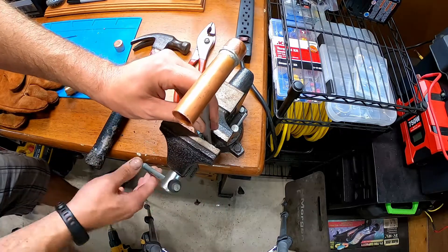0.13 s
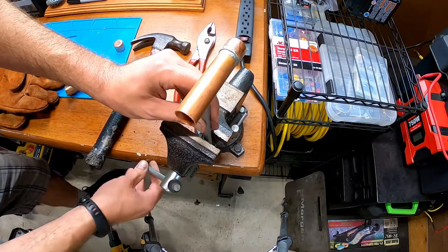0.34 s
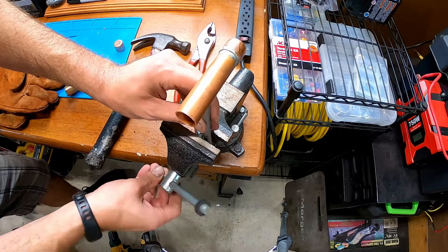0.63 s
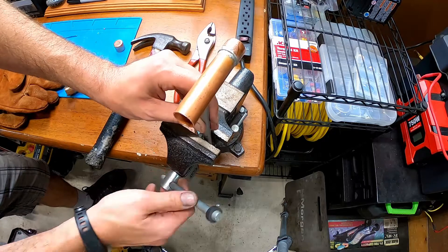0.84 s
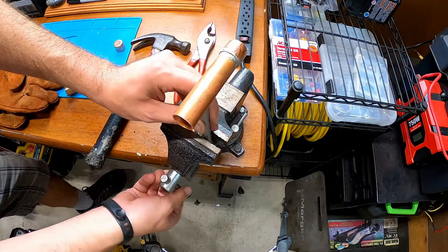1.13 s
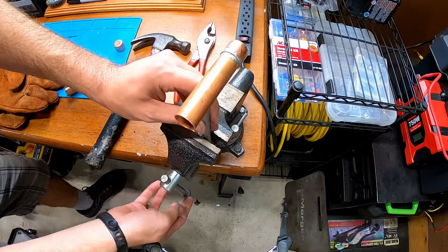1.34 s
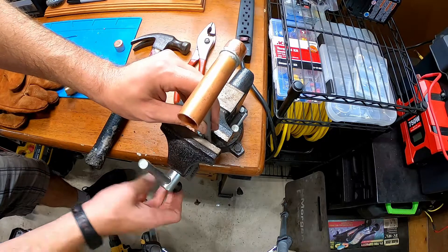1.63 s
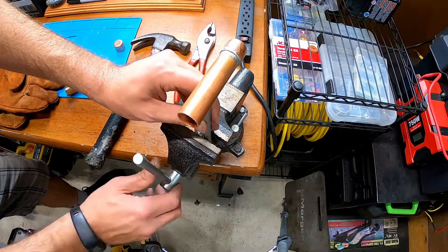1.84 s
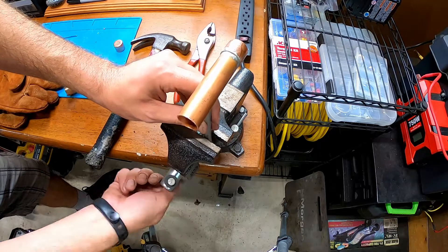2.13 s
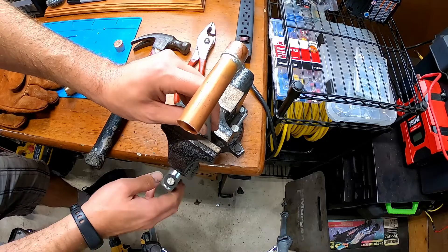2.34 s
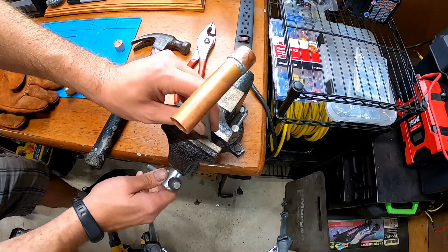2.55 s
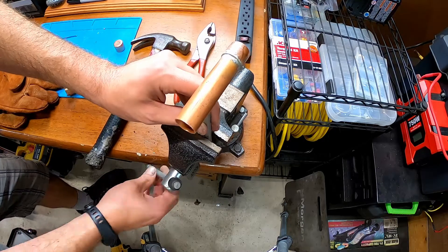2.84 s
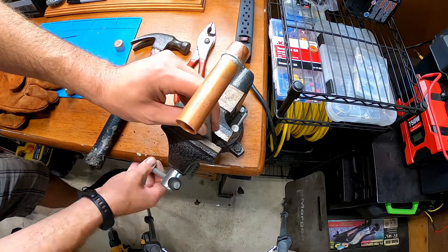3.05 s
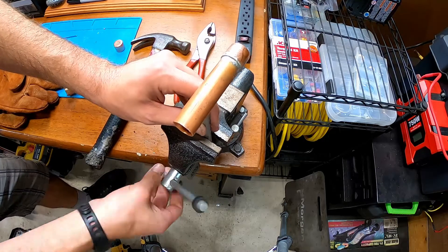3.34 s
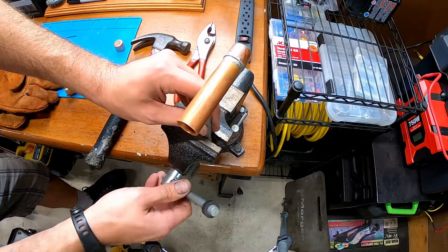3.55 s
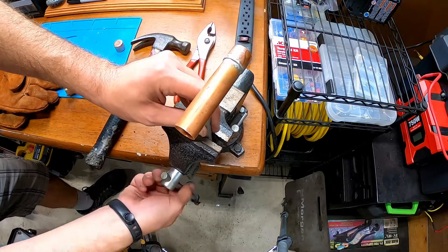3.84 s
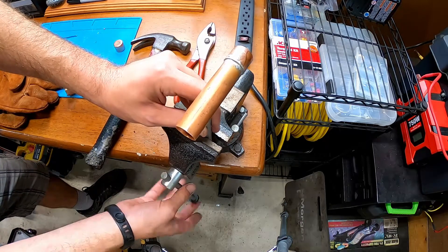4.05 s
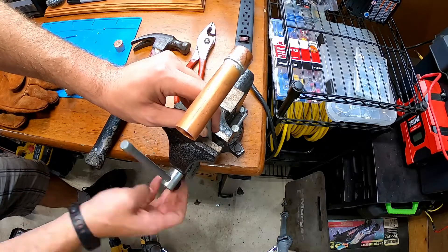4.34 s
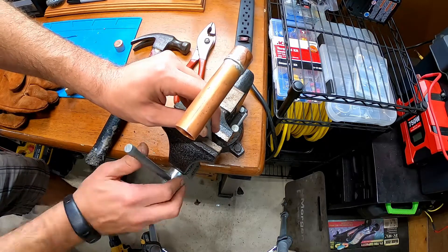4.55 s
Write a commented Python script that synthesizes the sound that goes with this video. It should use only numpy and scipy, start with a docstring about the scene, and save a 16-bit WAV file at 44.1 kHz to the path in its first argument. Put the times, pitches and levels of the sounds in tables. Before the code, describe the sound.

A dull iron clunk opens, then a bright sharp clack, a scrape, and more knocks as a vise handle turns and its bar slides to its stops. Quieter ticks fill the gaps, then a calmer stretch leads to a scrape and the brightest, loudest clank near the end. Dry close stereo pickup in a lightly reverberant garage, with a low murmur and faint insect-like hiss behind.

```python
"""Garage murmur and a thin high hiss, perhaps insects outside, run throughout: shaped and narrow noise.
Over them a cast-iron bench vise is cranked shut close by, its wooden bench humming in low noise bands.
The steel handle bar knocks at its stops: rattling contacts ring modes of iron and bar over noisy cracks.
It also scrapes through its hole, a train of tiny slips driving the same modes.
The garage answers with a sparse, thin reverb."""
import sys
import numpy as np
from scipy import signal
from scipy.fft import rfft, irfft, next_fast_len
from scipy.io import wavfile
from scipy.ndimage import uniform_filter1d

SR = 44100
rng = np.random.default_rng(int(sys.argv[2]) if len(sys.argv) > 2 else 0)


def file_out(sig):
    """Save sig as 16-bit WAV at sys.argv[1]."""
    # one column per channel
    cols = np.atleast_2d(sig).T
    # limit, then scale
    lim = np.clip(cols, -1, 1)
    pcm = np.round(lim * 32767).astype(np.int16)
    wavfile.write(sys.argv[1], SR, pcm)


N = 207262  # length in samples


def gain_of(db):
    """Decibels to an amplitude factor."""
    return 10 ** (np.asarray(db) / 20)


def evened(x):
    """Scales to rms 1."""
    return x / np.sqrt(np.mean(x ** 2) + 1e-20)


def smoothed_twice(x, size):
    """Two running means in a row."""
    return uniform_filter1d(uniform_filter1d(x, size), size)


def read(points, hz):
    """Reads a curve of (f/Hz, value) on a log-frequency axis."""
    f, value = np.transpose(points)
    return np.interp(np.log(hz + 1), np.log(f + 1), value)


def add(mix, s, sound):
    """Mixes a sound in at s seconds."""
    part = mix[round(s * SR):][:len(sound)]
    part += sound[:len(part)]


def resonate(x, hz, width):
    """One-pole resonance: shifts hz down to zero, smooths, and shifts back."""
    turn = np.exp(2j * np.pi * hz * np.arange(len(x)) / SR)
    r = np.exp(-np.pi * width / SR)
    return 2 * (turn * signal.lfilter([1 - r], [1, -r], x / turn)).real


def band(x, lo_hz, hi_hz):
    """Band-pass, scaled to rms 1."""
    return evened(signal.sosfilt(signal.butter(3, [lo_hz, hi_hz], "band", fs=SR, output="sos"), x))


def dying(power, t60):
    """Energy put in by the contacts leaks away; returns the amplitude."""
    return np.sqrt(abs(signal.lfilter([1], [1, -gain_of(-2 * 60 / SR / t60)], power)))


# spectral shape of the garage murmur: (f/Hz, relative level/dB)
MURMUR = [(15, -39.5), (25, -1), (63, -7.5), (119, -23), (208, -1.5), (498, -22.5), (554, -10), (892, -6),
          (1130, -7.5), (1330, -6.5), (1560, -7), (3830, -28), (7610, -25.5), (9410, -37.5), (14000, -73)]
MURMUR_DB = -56.5  # rms of the murmur, both channels together
# likeness of the murmur left and right: (f/Hz, correlation)
SAME = [(60, 0.83), (180, 0.68), (550, 0.34), (1650, 0.37), (4970, 0.38), (15000, -0.47)]
# thin high hiss: (f/Hz, width of each of two resonances/Hz, level/dB)
HISS = (7400, 600, -73)


def murmur():
    """Random short-time spectra with drifting patches, plus a narrow wavering hiss."""
    frames, hz = N // 256 + 5, np.fft.rfftfreq(1024, 1 / SR)
    a, b, c, d, patches = rng.standard_normal((frames, 513, 5)).T
    patches = uniform_filter1d(patches, 12, 0)  # across frequency
    patches = evened(uniform_filter1d(patches, 14, 1))  # across time
    same = np.clip(read(SAME, hz), -1, 1)[:, None]
    left = a + 1j * b
    right = same * left + np.sqrt(1 - same ** 2) * (c + 1j * d)
    spectra = np.array([left, right]) * gain_of(read(MURMUR, hz)[:, None] + 0.5 * patches)
    wash = signal.istft(spectra, nperseg=1024, noverlap=768)[1][:, :N]
    hiss_hz, width, hiss_db = HISS
    hiss = [resonate(resonate(noise, hiss_hz, width), hiss_hz, width)
            for noise in rng.standard_normal((2, N))]
    return gain_of(MURMUR_DB) * evened(wash) + gain_of(hiss_db) * evened(np.array(hiss))


# low hums of the bench: (f/Hz, width of the first two resonances/Hz)
BENCH = [(80, 140), (140, 16), (199, 38.4), (290, 205)]
# how each hum takes a jolt: (level/dB, share of lean, share of weight, lag/s, fall at length 1/dB per s)
TAKES = [(1.8, 0.01, 1.46, -0.00036, 297), (0.3, 1.19, 0.01, 0.0032, 223), (-0.7, -1.07, 0.01, 0.0024, 242),
         (-2, 0.65, 0.12, -0.013, 244)]
# jolts from knocks and cranking: (peak t/s, level/dB, lean among the hums/dB, weight/dB, length factor)
JOLTS = [(.02, -60.5, -1.5, -0.5, 2.7), (0.188, -38, 3, 0.5, 0.86), (.28, -60, -4, -1, 0.82),
         (.5, -59.5, -2, -9, 2.2), (.59, -54.5, -5, 0.5, 1.26), (.78, -47, 0.1, -3, 1.3),
         (.95, -57, -5.5, -1.5, 0.7), (1.05, -51.5, -0.5, -11, 1.45), (1.15, -45.5, -0.4, -4.5, 1.12),
         (1.28, -56, -11.5, -19, 1.5), (1.369, -51.5, -2.5, -26, 0.75), (1.5, -46.5, -4.5, -45, 1.26),
         (1.64, -50, -3, -29, 2), (1.789, -42.5, 1.5, -4, 0.96), (1.9, -56.5, 0, -10, 2.1),
         (2.14, -52, -3, -0.5, 1.9), (2.348, -55.5, 0, -25, 1.5), (2.53, -64.5, 12, -27, 1.4),
         (2.63, -40, 0.5, -4.5, 1), (2.88, -65, -2, -24, 0.72), (3.149, -56.5, -6, -28, 1.2),
         (3.27, -61.5, -2.5, -8, 1.6), (3.44, -49, -3, -12, 2.36), (3.55, -60, 1, -15, 1.1),
         (3.67, -61, -8.5, 1, 1.1), (3.741, -48, -1.5, -11, 1.04), (3.879, -40, -0.5, -1, 1.24),
         (4.22, -57.5, -3.5, -10, 1.4), (4.35, -45.5, -3.5, -19, 2.1), (4.478, -38, 2.5, -6, 1),
         (4.6, -43, -2, -8, 0.79)]
SWELL_S = 0.027  # rise before a peak, at length 1


def bench():
    """Uneven pushes from the screw, and the knocks, keep the low modes of the bench humming."""
    out, t = np.zeros(N), np.arange(N) / SR
    for (hz, width), (db, leans, weighs, lag, fall_db) in zip(BENCH, TAKES):
        hum = resonate(resonate(rng.standard_normal(N), hz, width), hz, width)
        envelope = abs(signal.hilbert(hum, next_fast_len(N))[:N])
        hum = evened(hum / envelope ** 0.91)  # steadier than pure chance
        hum = evened(resonate(hum, hz, 2 * width))
        slow, power = t[::64], 0
        for s, strength_db, lean_db, weight_db, length in JOLTS:
            since = (slow - s - lag) / max(length, .2)
            swell, fall = np.exp(-(since / SWELL_S) ** 2), gain_of(-fall_db * abs(since))
            shape = np.where(since < 0, swell, fall)
            jolt_db = strength_db + db + leans * lean_db + weighs * weight_db
            power = power + (gain_of(jolt_db) * shape) ** 2
        out += hum * np.interp(t, slow, np.sqrt(power))
    return out


# bench top modes under a knock: (f/Hz, relative level/dB, t60/s)
THUMP = [(259, 4.5, 0.17), (392, 2.5, 0.2), (516.3, -9, 0.29), (637.5, -2, 0.32), (812, 5.5, .2)]


def thump():
    """The bench top answers a knock late and softly; peak rms near 1."""
    t = np.arange(SR // 4) / SR
    hz, db, t60 = np.transpose(THUMP)[:, :, None]
    detune, phase = 1 + 0.03 * rng.standard_normal(hz.shape), rng.random(hz.shape)
    tones = np.sin(2 * np.pi * (hz * detune * t + phase))
    rung = (gain_of(db - 60 * t / t60) * tones).sum(0)
    rung *= 1 - np.exp(-t / 0.00073)  # soft onset
    return rung / np.sqrt(uniform_filter1d(rung ** 2, 900).max())


# modes of the iron body and of the bar's low, middle and treble ranges:
# (f/Hz, relative struck level/dB, relative rubbed level/dB, t60 before scaling/s)
IRON = [(492.8, -12, -27, 0.47), (606.4, -12, -11, 0.59), (735, -8.5, -7.5, 0.38),
        (842, -8.5, -20.5, 0.057), (955, 2, 0, 0.047), (1098.5, -1.5, -1.5, 0.11), (1212, 2.5, -2.5, 0.079),
        (1328, 5.5, 0, 0.065), (1315, -5, -8, 0.088), (1652, -1, -31, 0.065)]
BAR_LOW = [(1913, -8, -10, 0.15), (2203, -9, -10, 0.39), (2275, -8, -5, 0.25), (2490, -4.5, 1.5, 0.073),
           (2654, 1, 5.5, 0.045), (2880, -8.5, -20, 0.1), (3030, -5, -19.5, 0.089)]
BAR_MIDDLE = [(3340, 2, -6.5, 0.044), (3790, 10, 5, 0.013), (3913, 6.5, -3, 0.038), (4403, -10.5, -1, 0.13),
              (4500, -26, -2.5, 0.05)]
BAR_TREBLE = [(5520, 4.5, 9, 0.03), (5680, -21.5, -7.5, .1), (6320, 15, 7, 0.035), (7040, 9, 4.5, 0.058),
              (7440, 12, -5.5, 0.059), (9300, -1.5, -3.5, .1), (10550, -1.5, -25, .1),
              (12200, -7.5, -10.5, .08)]
# the four ringing parts: (modes, band from f/Hz, band to f/Hz, relative noisy crack level/dB,
# crack t60 before scaling/s)
PARTS = [(IRON, 502, 1780, 2.6, 0.17), (BAR_LOW, 1470, 2800, 0.88, 0.13),
         (BAR_MIDDLE, 2340, 5700, 1.1, 0.035), (BAR_TREBLE, 1830, 8200, 18.7, 0.027)]
# knocks: (t/s, iron body level/dB, bar low level/dB, bar middle level/dB, bar treble level/dB,
# bench thump level/dB, favoured low ring f/Hz)
KNOCKS = [(0.145, -25.5, -37, -44, -52.5, -46, 1230), (0.157, -27.5, -49, -54, -54, -44, 1350),
          (0.218, -60, -53, -59.5, -66, -48.5, 1340), (0.55, -43.5, -43, -50.5, -58, -71, 1420),
          (0.579, -37.5, -41.5, -57, -49.5, -47.5, 1680), (0.763, -26, -27, -21, -22, -43.5, 4220),
          (0.897, -53, -39, -39.5, -42.5, -57, 2730), (0.924, -42, -44, -40.5, -50, -47, 3900),
          (1.462, -39, -36.5, -32, -45.5, -50, 4020), (1.577, -43, -51, -50.5, -60, -57, 1270),
          (1.759, -27, -36, -29.5, -38, -47, 1184), (1.767, -35, -32.5, -38, -52, -41, 1360),
          (1.848, -38, -31, -36, -82, -46.5, 2310), (1.978, -52, -53, -71, -65, -62, 3110),
          (2.088, -37.5, -42, -53, -60.5, -48.5, 1120), (2.287, -48, -61, -55.5, -64, -59, 1310),
          (2.314, -47.5, -55, -56.5, -57, -53, 1800), (2.472, -49.5, -42.5, -49, -72, -82, 1250),
          (2.488, -38, -45, -51, -79, -70, 1410), (2.6, -24, -35, -40, -40.5, -35.5, 1174),
          (3.084, -53, -62, -64, -61, -57, 1380), (3.243, -59, -46.5, -60, -68, -65, 1730),
          (3.376, -32.5, -36.5, -30.5, -32.5, -53, 1330), (3.513, -52, -40.5, -38, -75, -50.5, 1910),
          (3.726, -41, -54, -61.5, -83.5, -46.5, 1030), (3.844, -42, -48, -55.5, -64, -44, 1053),
          (4.177, -47, -50.5, -66, -90, -58, 2780), (4.243, -47, -49, -60, -59.5, -67, 1580),
          (4.438, -22, -21.5, -22.5, -20.5, -44, 1190), (4.566, -35, -41, -34.5, -30, -41, 3950)]
TREBLE_RING_HZ = 5420  # the bar's favoured high ring
# rattle of a -40 dB knock in s; harder knocks rattle shorter, dB per dB
RATTLE_S, RATTLE_SHRINK = 0.0051, 0.18
# factor on t60 at -40 dB; harder knocks seat the bar and ring shorter, dB per dB
RING, RING_SHRINK = 0.73, 0.037


def knocks():
    """Each knock is a short rattle of contacts that rings the modes of iron and bar over a noisy crack."""
    out, t = np.zeros(N), np.arange(SR // 4) / SR
    for s, *levels_db, thump_db, low_hz in KNOCKS:
        add(out, s, gain_of(thump_db) * thump())
        hard_db = max(levels_db) + 40
        rattle = max(RATTLE_S / gain_of(RATTLE_SHRINK * hard_db), 1e-4)
        damping = max(RING / gain_of(RING_SHRINK * hard_db), .1)
        contacts = rng.exponential(1, len(t)) * (rng.random(len(t)) < .02)
        contacts *= np.exp(-(t / rattle) ** 2)
        contacts[0] = 0.95
        contacts = uniform_filter1d(contacts, size=24, origin=5)  # each contact takes a moment
        contacts = uniform_filter1d(contacts, size=16)
        favoured_hz = np.array([low_hz, TREBLE_RING_HZ])
        for (modes, lo_hz, hi_hz, crack_db, crack_t60), db in zip(PARTS, levels_db):
            crack = band(rng.standard_normal(len(t)), lo_hz, hi_hz)
            rung = gain_of(crack_db) * dying(contacts, crack_t60 * damping) * crack
            for hz, struck_db, _, t60 in modes:
                # the place of the blow favours two rings
                struck_db += 10.2 * np.exp(-(np.log(hz / favoured_hz) / 0.13) ** 2).sum()
                # loose parts split each mode
                detune, phase = 1 + 0.0168 * rng.standard_normal((4, 1)), rng.random((4, 1))
                cluster = np.sin(2 * np.pi * (hz * detune * t + phase)).sum(0)
                rung += gain_of(struck_db - 9.0) * dying(contacts, t60 * damping) * cluster
            loudest = np.sqrt(uniform_filter1d(rung ** 2, 400).max())
            add(out, s - .0015, gain_of(db) * rung / loudest)
    return out


# the bar sliding and the screw rubbing, one curve a stroke: (t/s, level/dB, brightness/dB)
SCRAPES = [
    [(0.56, -50, -9), (0.582, -46, -4), (0.622, -51, -1), (0.678, -37.5, -10.5), (0.745, -44, -3.5)],
    [(0.85, -49.5, 2), (0.888, -48.5, -5), (0.898, -41, -7), (0.938, -55.5, -7), (0.99, -62, -18)],
    [(1.59, -40.5, -6.5), (1.608, -51, 1), (1.622, -39, -10), (1.728, -35.5, -5), (1.745, -48.5, 10.5)],
    [(2.3, -52, -15), (2.318, -55, 5), (2.358, -70, -6), (2.38, -73, -5)],
    [(3.1, -68, -7), (3.122, -66, -23), (3.136, -63, -19), (3.142, -63, -22), (3.15, -77, -17)],
    [(3.23, -64, 3), (3.246, -52, -4.5), (3.272, -35.5, -25), (3.286, -47, -13), (3.36, -40.5, -16)],
    [(3.42, -40, -9.5), (3.5, -49, -9.5)],
    [(4.26, -54, -18), (4.274, -55, -4), (4.316, -40.5, 10.5), (4.352, -35, -1), (4.42, -35.5, -11)],
    [(4.5, -35, -14), (4.55, -45, 0)],
]
# how each of the PARTS takes the rub: (level/dB, share of the brightness)
RUBBED = [(-1.5, 0.01), (-1.5, 0.26), (-2.5, 0.75), (-7.5, 0.87)]
# how freely parts ring in each stroke, by where the bar sits in its hole:
# (iron body level/dB, bar middle level/dB)
SEATING = [(-0.5, 4), (-1, .1), (-1.1, 0), (-2, 3.2), (3, .1), (-3, -0.5), (2.2, 2.7), (1.3, -6),
           (-1.2, -4.5)]


def scrapes():
    """Rough steel on iron: an uneven train of tiny slips drives the same modes, widened by the contact."""
    strengths = gain_of(1.9 * np.minimum(rng.exponential(1, N), 5))
    slips = strengths * rng.choice([-1, 1], N) * (rng.random(N) < 3500 / SR)  # about 3500 slips per s
    grip = evened(uniform_filter1d(rng.standard_normal(N), 200))  # catches and lets go
    slips *= gain_of(2.0 * grip)
    out = np.zeros(N)
    for k, ((modes, lo_hz, hi_hz, *_), (part_db, share)) in enumerate(zip(PARTS, RUBBED)):
        rubbed = gain_of(-1.5) * evened(slips)
        for hz, _, rubbed_db, t60 in modes:
            shift = evened(smoothed_twice(rng.standard_normal(N), 1200))  # the contact point wanders
            rubbed += gain_of(rubbed_db + 4.8 * shift) * evened(resonate(slips, hz, 7.6 / t60))
        rubbed = band(rubbed, 0.61 * lo_hz, 1.19 * hi_hz)
        # steady hand pressure evens the rub
        rubbed = evened(rubbed / abs(uniform_filter1d(rubbed ** 2, 900)) ** 0.14)
        for rows, (iron_db, middle_db) in zip(SCRAPES, SEATING):
            s, level_db, bright_db = np.transpose(rows)
            seating_db = (iron_db, 0, middle_db, 0)[k]
            db = level_db + part_db + share * bright_db + seating_db
            at = np.arange(round((s[0] - .012) * SR), round((s[-1] + 0.042) * SR))
            stroke = rubbed[at] * gain_of(np.interp(at / SR, s, db))
            add(out, at[0] / SR, stroke * signal.windows.tukey(len(at), .1))
    return out


# reverb of the garage: (f/Hz, t60/s)
GARAGE = [(150, 0.59), (600, 0.53), (1500, 0.38), (4000, 0.31), (10000, 0.27)]


def garage(x):
    """Sparse taps of random sign, each band dying at its own speed."""
    taps = np.zeros((2, SR // 2))
    at = np.arange(200, SR // 2 - 20, 20)
    at = at + rng.integers(0, 20, (2, len(at)))
    np.put_along_axis(taps, at, rng.choice([-1., 1.], at.shape), 1)
    hz, t, spectra = signal.stft(taps, SR, nperseg=256)
    fade = gain_of(-60 * t / read(GARAGE, hz)[:, None])
    tail = signal.istft(spectra * fade, SR, nperseg=256)[1]
    return signal.fftconvolve(x[None], tail / np.linalg.norm(tail[0]), axes=1)[:, :N]


# sound that differs between the microphone ports: (f/Hz, level/dB)
SCATTER = [(60, -15.5), (350, -15.5), (750, -3.5), (1700, -0.5), (3000, -5.5), (4200, -28), (5500, -3),
           (9000, 2.5)]
# colour of the two ports: (f/Hz, left over right level/dB)
LEAN = [(450, 0), (1200, 2.5), (2000, 1), (2700, 4), (4000, 0), (5600, -4), (7300, -5), (8300, 0),
        (9800, 3), (12000, 0)]


def ports(x):
    """Sound scattered by the bench top and tools reaches the two ports unlike; each has its own colour."""
    size = next_fast_len(N + 2000)
    hz = np.fft.rfftfreq(size, 1 / SR)
    paths = rng.standard_normal(1500) * gain_of(-60 * np.arange(1500) / SR / 0.025)
    unlike = gain_of(read(SCATTER, hz)) * rfft(paths / np.linalg.norm(paths), size)
    pair = np.array([1 + unlike, 1 - unlike])
    # scatter moves no energy across
    pair /= np.sqrt(uniform_filter1d(abs(pair) ** 2, size=500, mode="nearest"))
    lean = gain_of(read(LEAN, hz) / 2)
    return irfft(rfft(x, size) * pair * np.array([lean, 1 / lean]), size)[:, :N]


GARAGE_DB = -6  # reverb level


def scene():
    """Background, bench, vise and room; the open garage returns little bass."""
    background = murmur()
    hum = bench()
    metal = knocks() + scrapes()
    thinned = signal.lfilter(*signal.butter(1, 500, "high", fs=SR), metal)
    return ports(metal + hum) + gain_of(GARAGE_DB) * garage(thinned) + background


EDGE_HZ = 14600  # upper band limit


def record(dry):
    """The microphone loses deep bass and top treble; then a steep low-pass sets the band limit."""
    bass_cut = signal.butter(2, 45, "high", fs=SR, output="sos")
    treble_cut = signal.butter(1, 16000, fs=SR, output="sos")
    soft = signal.sosfilt(np.vstack([bass_cut, treble_cut]), dry)
    edge = signal.firwin(511, EDGE_HZ, window=("kaiser", 9), fs=SR)
    return signal.oaconvolve(soft, edge[None], "same")


dry = scene()
out = record(dry)
file_out(out)
```